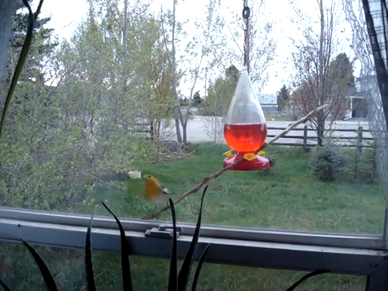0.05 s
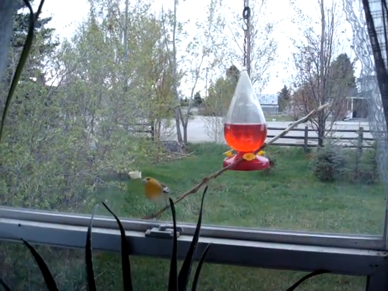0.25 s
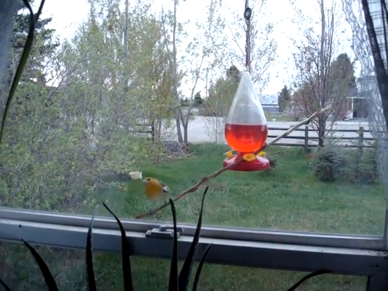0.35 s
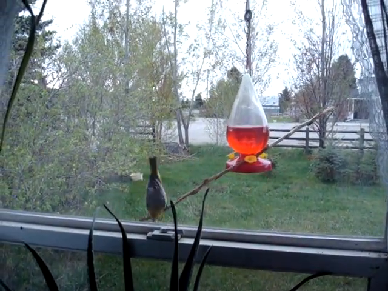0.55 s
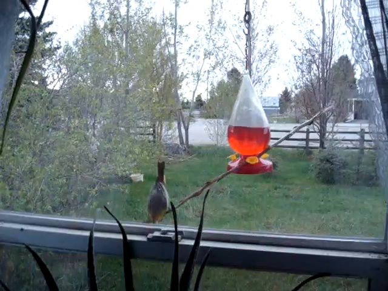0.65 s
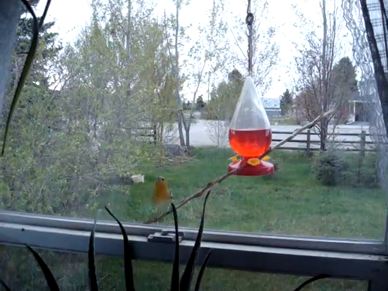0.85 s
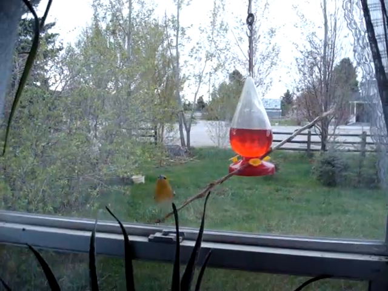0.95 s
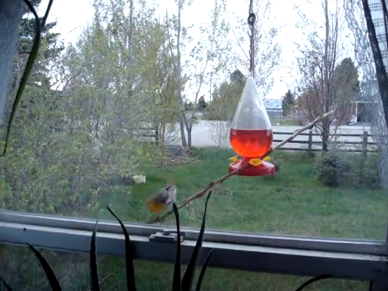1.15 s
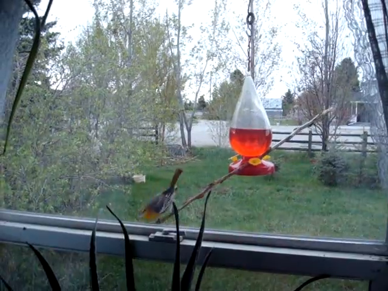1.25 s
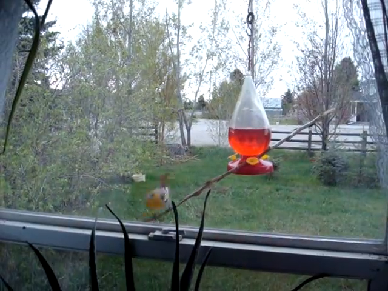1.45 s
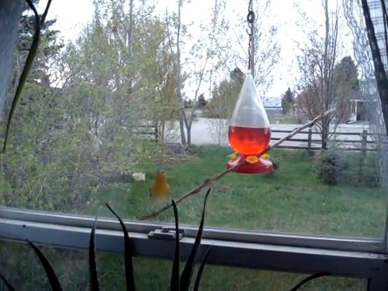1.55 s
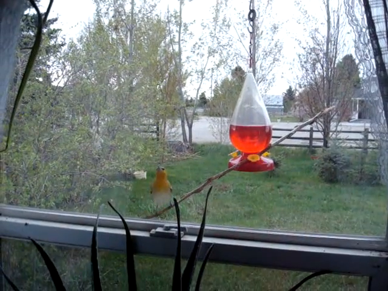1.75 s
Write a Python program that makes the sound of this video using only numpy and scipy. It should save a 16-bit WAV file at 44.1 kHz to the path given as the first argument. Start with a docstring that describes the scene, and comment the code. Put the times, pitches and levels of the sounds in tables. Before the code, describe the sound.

A bird knocks once against a window pane while small birds chirp outside.

```python
"""Bird strike on a window

Heard from indoors, one knock: the pane booms in its modes, ticks in its frame, and the room rings briefly.
The bird's wings rustle now and then. Small birds outside whistle about three chirps a second and one
louder arched call, all trailed by garden echoes. Quiet, steady hiss and faint hum lie underneath."""
import sys
import numpy as np
from scipy import signal
from scipy.fft import rfft, irfft
from scipy.io import wavfile

SR = 44100
rng = np.random.default_rng(int(sys.argv[2]) if len(sys.argv) > 2 else 0)


def put_to_file(sound):
    """Save the sound as 16-bit audio at rate SR, in the file named by the first command-line argument."""
    columns = np.atleast_2d(sound).T  # one column per channel
    safe = np.clip(columns, -1, 1)
    whole_steps = np.round(safe * 32767)
    wavfile.write(sys.argv[1], SR, whole_steps.astype(np.int16))


N = 79380

# window modes: freq_hz, relative_db, t60_s
PANE_MODES = [(144, -24.5, 1), (188, -26.5, 1), (215, -11.5, 0.88), (262, -9.5, 0.54), (270.3, -2.5, 0.51),
              (336, -11, 0.66), (373.3, -5.5, 0.71), (381.6, -7, 0.29), (420.5, -9, 0.57), (434, 2, 0.4),
              (462.2, -1.5, 0.39), (465, -6, 0.35), (508, -7, 0.52), (533, -3, 0.51), (617, -10, 0.21),
              (652, 0.5, 0.28), (659, -8.5, 0.32), (701, -4.5, 0.28), (752, -8.5, 0.4), (852, -11, 0.23),
              (905, -5.5, .31), (939, -15, 0.24), (1016, -10.5, 0.32), (1065, -15, 0.3),
              (1262, -11.5, 0.27), (1300, -21.5, .27), (1415, -5.5, 0.18), (1512, -25, 0.22)]
# dense ring of frame and room: centre_hz, level_db, t60_s
RING_BANDS = [(30, -68, 0.53), (70, -65, .4), (145, -65, 0.28), (281, -39.5, 0.41), (457, -33.5, 0.61),
              (690, -35.5, 0.32), (974, -42.5, 0.37), (1400, -38, 0.26), (1900, -52, 0.32),
              (2520, -45, 0.18), (4000, -55, 0.23), (6120, -75, .08), (9000, -70, .08)]
# beak tap and ticks of the pane in its frame: start_s, level_db
TICK_HITS = [(0.234, -38.5), (0.24, -49), (0.2647, -47), (0.294, -49.5)]
# tick spectrum: freq_hz, relative_db
TICK_SPECTRUM = [(60, -25), (800, -18), (2500, 15), (4200, 5.5), (5800, 16.5), (7000, 0.5), (10000, -14)]
# wing rustles: start_s, rise_s, t60_s, level_db, centre_hz, half_width_oct
WING_RUSTLES = [(0.519, 0.011, 0.31, -46, 1050, 1.48), (.944, 0.0049, 0.63, -55.5, 1220, 1.1),
                (1.127, .008, 0.2, -53, 1460, 0.61), (1.496, .015, 0.23, -52, 830, 0.76),
                (1.645, 0.008, 0.6, -53, 1390, 0.76)]
# chirps that sag, then flick up: start_s, length_s, pitch_hz, level_db, octave_db, skipped_fraction
CHIRP_NOTES = [(.094, 0.052, 3503, -48, -24, 0.0053), (.469, .048, 3607, -47.5, -18, 0.25),
               (.777, .056, 3540, -48.5, -13, 0), (1.079, 0.066, 3764, -51, -15, 0)]
# chirp contour: position_fraction, pitch_ratio, gain_db
CHIRP_CONTOUR = [(0, 1.08, -16.5), (0.199, 1.05, -6), (.43, 1, -2), (0.579, 1.01, -0.5),
                 (0.759, 1.13, -4.5), (.9, 1.22, -5.5), (1, 1.27, -11)]
# notes that hold, then slide down: start_s, length_s, pitch_hz, level_db, octave_db, skipped_fraction
SLUR_NOTES = [(1.35, .078, 4247, -49.5, -36, 0), (1.752, .07, 4330, -49.5, -19, 0)]
# slur contour: position_fraction, pitch_ratio, gain_db
SLUR_CONTOUR = [(0, 1.03, -11), (.25, .99, -10.5), (0.499, 1, -2.5), (0.659, .8, 0), (.82, .65, -3.5),
                (1, .63, -5)]
# arched call: time_s, pitch_hz, level_db, roughness_fraction
CALL_CONTOUR = [(1.392, 5100, -57, 0.46), (1.411, 5745, -49, 0.18), (1.428, 6050, -43, 0.04),
                (1.445, 6330, -38.5, 0.04), (1.461, 6380, -44, 0.35), (1.475, 6420, -34.5, 0.83),
                (1.491, 5710, -38, 0.4), (1.508, 5065, -38.5, 0.78), (1.525, 4920, -41, 0.83),
                (1.536, 4665, -51, 0.9)]
# weaker tones that follow the call: pitch_ratio, clear_db, rough_db
CALL_SIDE_TONES = [(.745, -25, -9.5), (1.462, -12, -32)]
# echoes off wall, fence and trees: delay_s, gain_db
GARDEN_ECHOES = [(.0075, -8), (.016, -10.5), (.027, -11), (.039, -31)]
# hiss spectrum: freq_hz, relative_db
AIR_SPECTRUM = [(15, -56), (25, -24.5), (180, -9), (392, -2), (479, -4.5), (770, -6.5), (830, -7.5),
                (941, -6.5), (1090, -6.5), (1180, -9), (1340, -10.5), (1990, -11.5), (2900, -14),
                (3820, -13), (4440, -15), (6460, -17.5), (9880, -19.5), (12800, -56), (21700, -120)]
# faint room tones: freq_hz, relative_db
HUM_TONES = [(328.4, -70), (387.6, -76), (484.5, -70), (1168, -72)]

KNOCK_S, PANE_RISE_S, PANE_GAIN_DB = 0.2345, 0.005, -27
RING_RISE_S, RING_HOLD_S = 0.00056, 0.01
TICK_RISE_S, TICK_T60_S = 0.00073, 0.037
NOTE_JITTER, JITTER_PER_BEND, FLUTTER_DB = 0.011, 0.154, 1.1
CALL_WAVER, CALL_JITTER, CALL_RASP_DB = 0.016, 0.051, 3
BUZZ_HZ, BUZZ_DEPTH = 853, 0.1
TAIL_DELAY_S, TAIL_RISE_S, TAIL_T60_S, TAIL_DB = 0.002, 0.03, 0.18, -4.5
AIR_DB, AIR_WANDER_DB = -55, -0.86
HUM_GAIN_DB, HUM_HALF_WIDTH_HZ = -1, 3.1
CUTOFF_HZ = 10000


def window_knock():
    """One impact excites the pane's modes, a dense ring of frame and room, and bright ticks."""
    age_s = clock() - KNOCK_S
    pane = sum(undb(db) * np.sin(2 * np.pi * hz * age_s) * burst(KNOCK_S, PANE_RISE_S, t60_s)
               for hz, db, t60_s in PANE_MODES)
    log_centres = np.log([row[0] for row in RING_BANDS])
    ring = 0
    for weights, (_, db, t60_s) in zip(np.eye(len(RING_BANDS)), RING_BANDS):
        band = noise(lambda f: np.interp(np.log(f), log_centres, weights))
        ring += undb(db) * band * burst(KNOCK_S, RING_RISE_S, t60_s, RING_HOLD_S)
    tick_envelope = sum(undb(db) * burst(start_s, TICK_RISE_S, TICK_T60_S) for start_s, db in TICK_HITS)
    return undb(PANE_GAIN_DB) * pane + ring + coloured(TICK_SPECTRUM) * tick_envelope


def wing_rustles():
    """Soft, grainy puffs of feather noise."""
    puffs = 0
    for start_s, rise_s, t60_s, db, centre_hz, half_width_oct in WING_RUSTLES:
        feathers = noise(lambda f: 1 / (1 + (np.log2(f / centre_hz) / half_width_oct) ** 2)
                         * f / (f + 200))
        puffs += undb(db) * burst(start_s, rise_s, t60_s) * feathers
    grain_db = wander(rate_hz=140)
    return puffs * undb(grain_db)


def arched_call():
    """A wavering, rising whistle that breaks into a buzz as it falls."""
    times_s, *columns = np.array(CALL_CONTOUR).T
    pitch_hz, level_db, roughness = (np.interp(clock(), times_s, column) for column in columns)
    buzz = np.sin(running_phase(BUZZ_HZ * (1 + 0.1 * wander(rate_hz=97))))
    waver = CALL_WAVER * wander(rate_hz=450)
    rasp = roughness * (BUZZ_DEPTH * buzz + CALL_JITTER * wander(rate_hz=700))
    phase = running_phase(pitch_hz * (1 + waver + rasp))
    sides = sum(undb(clear_db + roughness * (rough_db - clear_db)) * np.sin(ratio * phase)
                for ratio, clear_db, rough_db in CALL_SIDE_TONES)
    envelope = undb(level_db + CALL_RASP_DB * wander(rate_hz=280)) * gate(times_s[0], times_s[-1])
    return np.sqrt(2) * envelope * (np.sin(phase) + sides)


def bird_notes(notes, contour):
    """Whistles on one contour, with a weak octave; they roughen as the pitch bends."""
    positions, ratios, gains_db = np.array(contour).T
    song = 0
    for start_s, length_s, pitch_hz, level_db, octave_db, skipped in notes:
        position = skipped + (1 - skipped) * (clock() - start_s) / length_s
        bend = np.interp(position, positions, ratios)
        jitter = (NOTE_JITTER + JITTER_PER_BEND * abs(bend - 1)) * wander(rate_hz=700)
        phase = running_phase(pitch_hz * bend * (1 + jitter))
        swell_db = np.interp(position, positions, gains_db) + FLUTTER_DB * wander(rate_hz=200)
        envelope = undb(level_db + swell_db) * gate(start_s, start_s + length_s)
        song += np.sqrt(2) * envelope * (np.sin(phase) + undb(octave_db) * np.sin(2 * phase))
    return song


def garden_echoes(song):
    """Direct sound, distinct reflections and a short scattered tail."""
    tail = rng.standard_normal(N) * burst(TAIL_DELAY_S, TAIL_RISE_S, TAIL_T60_S)
    scattered = signal.fftconvolve(song, tail / np.linalg.norm(tail))[:N]
    echoes = sum(undb(db) * np.pad(song, (int(delay_s * SR), 0))[:N] for delay_s, db in GARDEN_ECHOES)
    return song + echoes + undb(TAIL_DB) * scattered


def background():
    """Steady hiss plus faint, wavering tones of narrowband noise."""
    air = coloured(AIR_SPECTRUM) * undb(AIR_DB + AIR_WANDER_DB * wander(rate_hz=3.9))
    hum = sum(undb(db) * noise(lambda f: 1 / (1 + ((f - hz) / HUM_HALF_WIDTH_HZ) ** 2))
              for hz, db in HUM_TONES)
    return air + undb(HUM_GAIN_DB) * hum


def undb(db):
    """Decibels to gain."""
    return 10 ** (np.asarray(db) / 20)


def clock():
    """Sample times in seconds."""
    return np.arange(N) / SR


def noise(gain_at):
    """Unit-rms noise shaped by gain_at(freq_hz)."""
    freq_hz = np.maximum(np.fft.rfftfreq(N, 1 / SR), 1)
    shaped = irfft(rfft(rng.standard_normal(N)) * gain_at(freq_hz), N)
    return shaped / shaped.std()


def coloured(spectrum):
    """Unit-rms noise shaped by (freq_hz, relative_db) points."""
    hz, db = np.array(spectrum).T
    return noise(lambda f: undb(np.interp(np.log(f), np.log(hz), db)))


def wander(rate_hz):
    """Smooth random motion, unit rms."""
    return noise(lambda f: 1 / (1 + (f / rate_hz) ** 2))


def burst(start_s, rise_s, t60_s, hold_s=0):
    """Envelope: linear rise, hold, exponential decay."""
    age_s = clock() - start_s
    decay_db = -60 * np.maximum(age_s - rise_s - hold_s, 0) / t60_s
    return np.clip(age_s / rise_s, 0, 1) * undb(decay_db)


def running_phase(pitch_hz):
    """Phase in radians of a moving pitch."""
    return 2 * np.pi * np.cumsum(pitch_hz) / SR


def gate(start_s, end_s, fade_s=0.0016):
    """Note window with linear fades."""
    return np.clip(np.minimum(clock() - start_s, end_s - clock()) / fade_s, 0, 1)


def scene():
    """Knock and wings at the window, song from the garden, background; mono."""
    song = bird_notes(CHIRP_NOTES, CHIRP_CONTOUR) + bird_notes(SLUR_NOTES, SLUR_CONTOUR) + arched_call()
    return (window_knock() + wing_rustles() + garden_echoes(song) + background())[None]


def record(dry):
    """Steep elliptic low-pass."""
    return signal.sosfilt(signal.ellip(12, 0.2, 70, CUTOFF_HZ, fs=SR, output="sos"), dry)


dry = scene()
out = record(dry)
put_to_file(out)
```